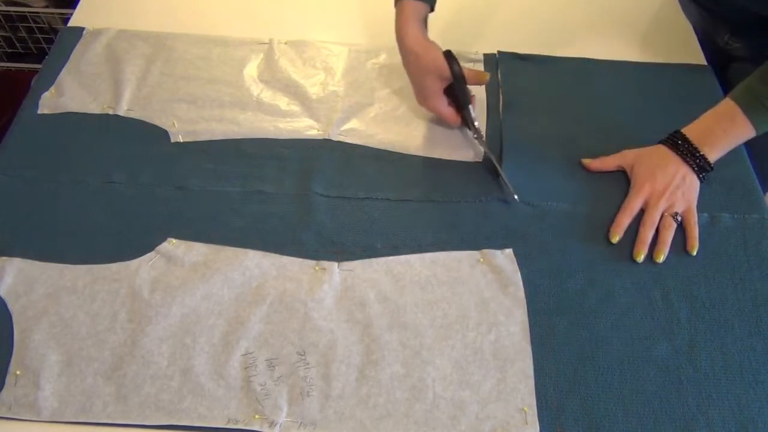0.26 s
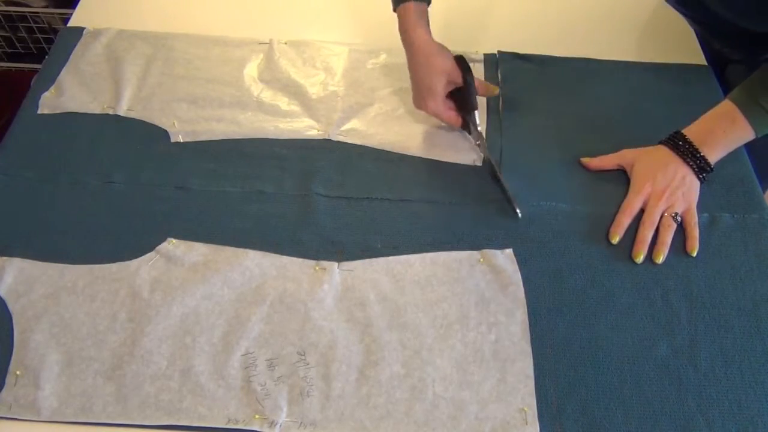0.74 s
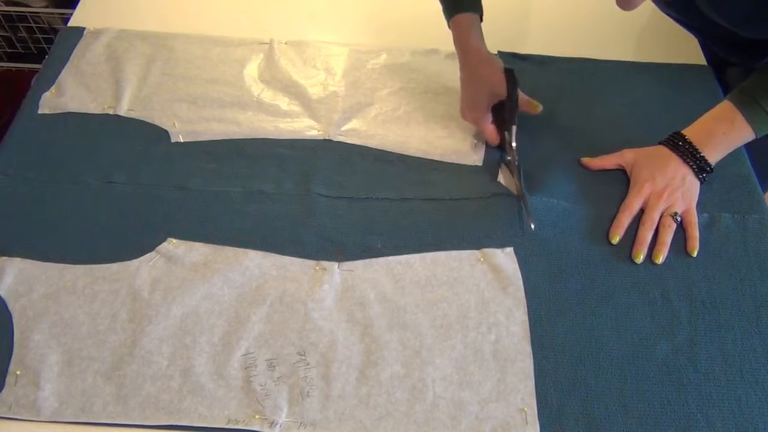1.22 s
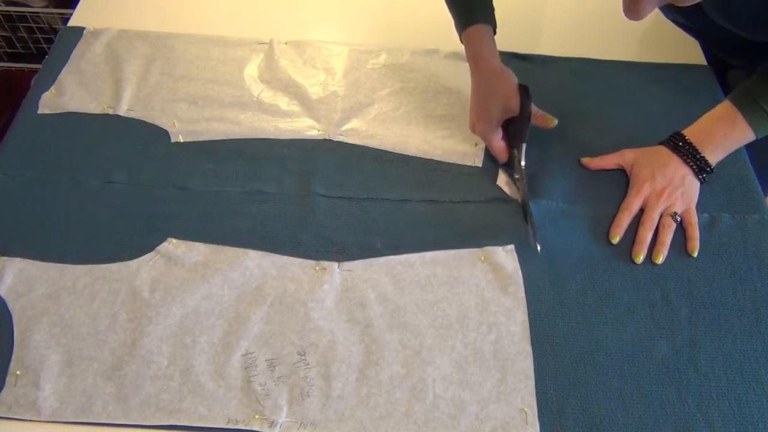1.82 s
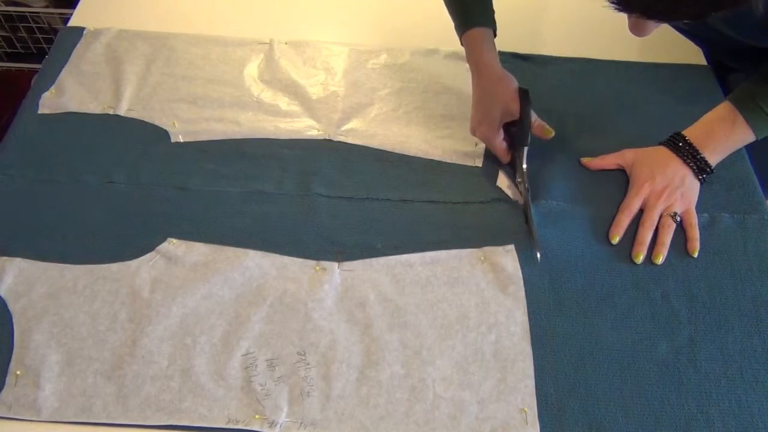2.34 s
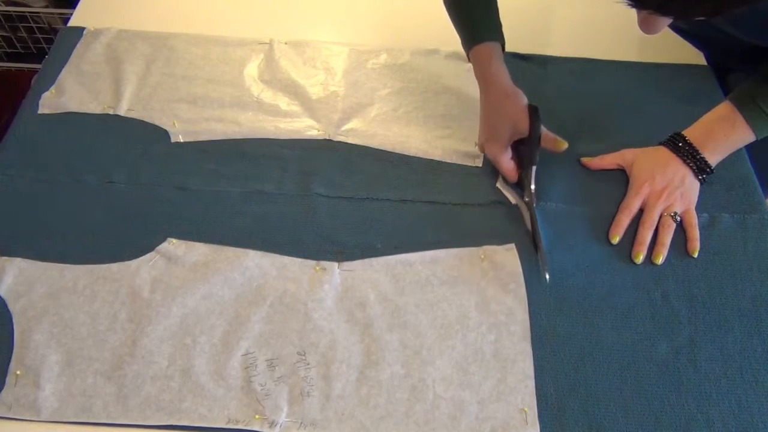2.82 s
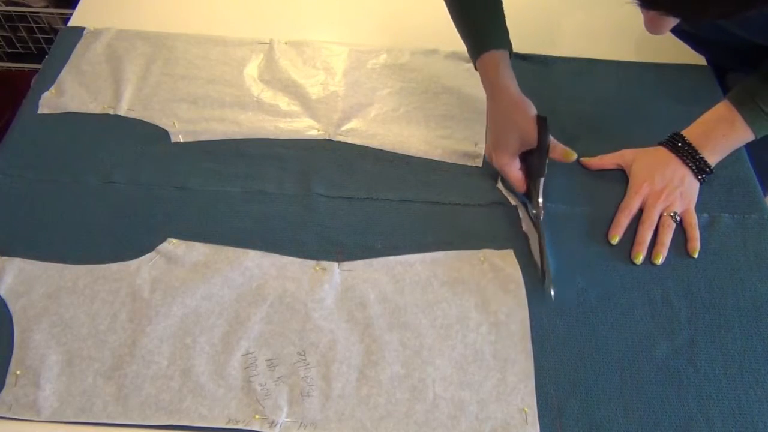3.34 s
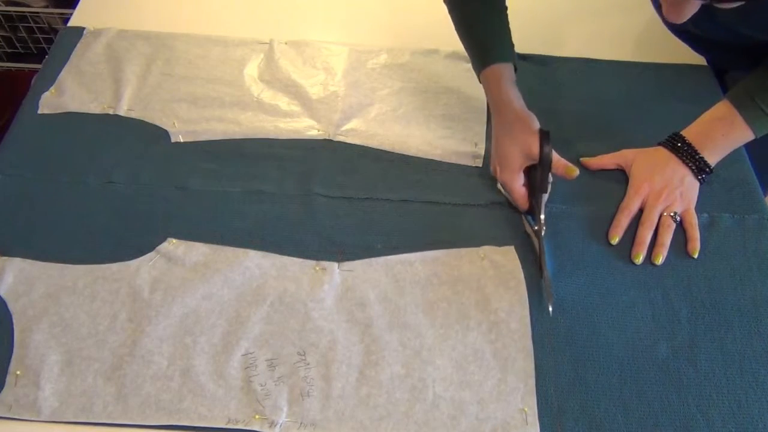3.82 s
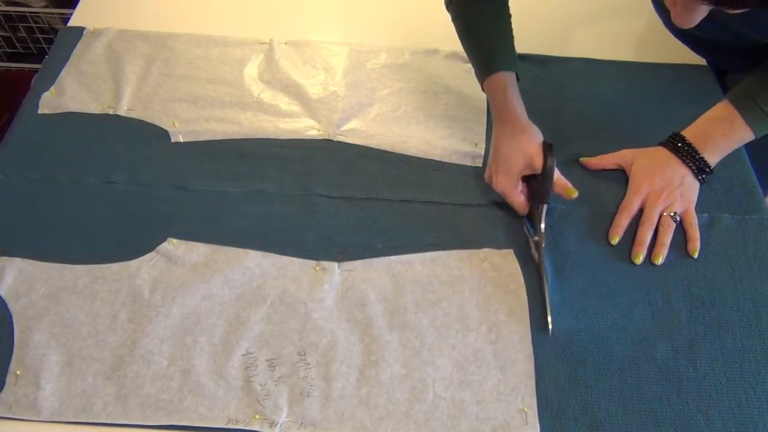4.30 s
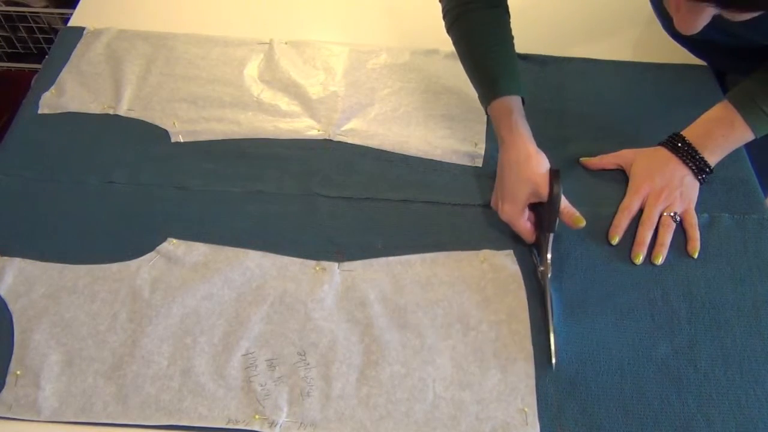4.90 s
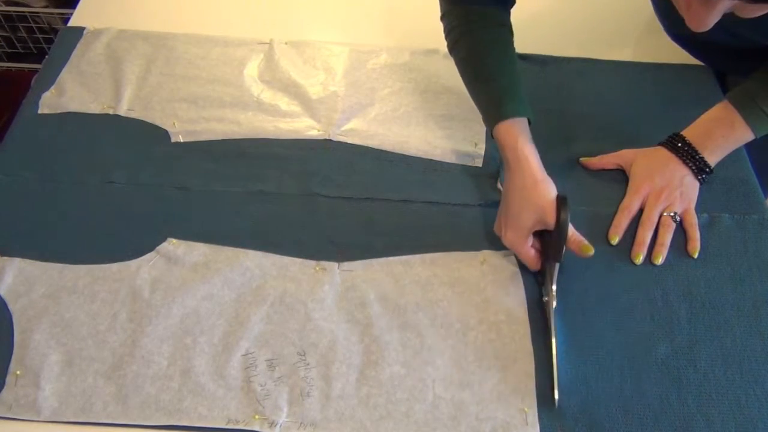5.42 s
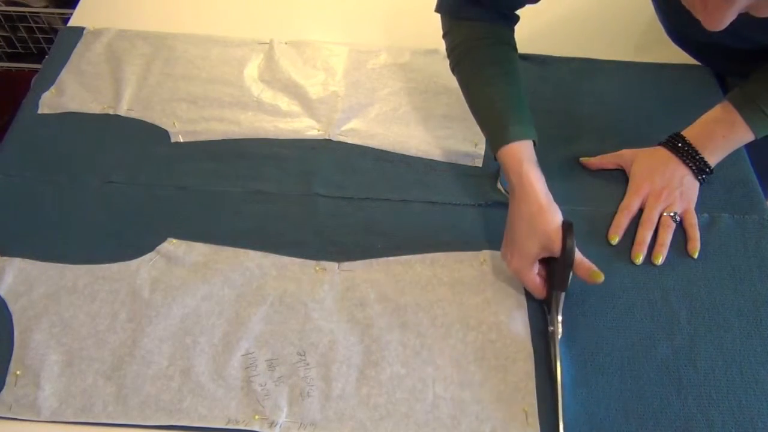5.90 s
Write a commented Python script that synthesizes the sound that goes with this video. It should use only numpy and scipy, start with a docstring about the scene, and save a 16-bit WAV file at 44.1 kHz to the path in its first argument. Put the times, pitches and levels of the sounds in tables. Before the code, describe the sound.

Large shears crunch through cloth on a wooden table in repeated close strokes, with fabric sliding and paper ticking between cuts.

```python
"""Large shears cut cloth that lies on a wooden table in a quiet room. Threads part in a dense crunch,
the blades stick and slip, and steel, handles and table top ring with it. The tips snip shut once;
between strokes cloth slides, the lower blade rubs the table, and paper and pivot tick. A small two-port
microphone hears the table's bass in opposite phase and overloads on the hardest slips."""
import sys
import numpy as np
from scipy import signal
from scipy.fft import rfft, irfft, next_fast_len
from scipy.io import wavfile
from scipy.ndimage import map_coordinates

SR = 44100
rng = np.random.default_rng(int(sys.argv[2]) if len(sys.argv) > 2 else 0)


def to_wav(sig):
    """Store sig (one row per channel, or 1-D mono) as 16-bit WAV at the path in sys.argv[1].

    Samples outside -1..1 are clipped; the rate is SR.
    """
    pcm = np.clip(np.atleast_2d(sig), -1, 1) * 32767
    pcm = np.round(pcm).astype(np.int16)
    wavfile.write(sys.argv[1], SR, pcm.T)  # frames by channels


N = 271426

# cloth sliding on the blades: (time [s], level [dB], fizz above that level [dB])
CLOTH_SLIDE = [(0, -37, -10.5), (.12, -40, -9), (.3, -43, -8), (.55, -56, -10), (1.05, -39.5, -4),
               (1.24, -52, -21), (1.8, -42, -7.5), (2.05, -54, -8), (2.8, -40.5, -11), (2.96, -56, 4),
               (3.5, -43, -3), (3.75, -54, -20), (4.0, -40, 1), (4.1, -59, -25), (4.63, -35, 0.5),
               (4.76, -43.5, -5), (5.2, -39.5, -2), (5.7, -36, -9.5), (6.15, -41.5, -1)]
# resonances of the steel blades: (frequency [Hz], width [Hz], level [dB])
BLADE_MODES = [(1588, 17, -0.5), (1830, 45, 5), (1973, 91, 4.5), (2082, 113, 5.5), (2250, 107, 7),
               (2441, 75, 3), (2627, 74, -1.5), (2890, 110, -9), (3380, 2800, -8.5)]


def amp(db):
    return 10 ** (np.asarray(db) / 20)


def unit_rms(x):
    return x / np.sqrt(np.mean(x ** 2) + 1e-20)


def along(points, hz):
    """Read a curve of (frequency, value) points on a log frequency axis."""
    f, v = np.transpose(points)
    return np.interp(np.log(hz + 1), np.log(f + 1), v)


def wobble(rate):
    """A smooth random curve with `rate` knots a second."""
    return map_coordinates(rng.standard_normal(int(N * rate / SR) + 4), [np.arange(N) * rate / SR])


def filtered(x, response):
    """Shape x with a complex frequency response."""
    size = next_fast_len(N + SR // 2)
    return irfft(rfft(x, size) * response(np.fft.rfftfreq(size, 1 / SR)), size)[..., :N]


def ring(force, modes, low_hz, high_hz):
    """Drive resonances that radiate between two band edges; white noise keeps its level."""
    def response(f):
        h = sum(amp(db) * 1j * f * width / (hz * hz - f * f + 1j * f * width) for hz, width, db in modes)
        h = h * (1j * f / (low_hz + 1j * f)) ** 3 / (1 + 1.2j * f / high_hz - (f / high_hz) ** 2) ** 2
        return h / np.sqrt(np.mean(abs(h) ** 2))
    return filtered(force, response)


def room_tone():
    """Soft hiss and rumble, and two thin electrical tones."""
    # colour of the noise: (frequency [Hz], relative density [dB])
    colour = [(15, -37), (25, -2), (54, 0.5), (75, -3), (128, -6), (231, -8.5), (450, -13), (709, -9),
              (952, -16), (1120, -14), (2180, -8), (6200, -24.5), (15000, -31)]
    # its stereo width: (frequency [Hz], side above mid [dB])
    width = [(60, 9), (200, -1), (700, -4), (2400, -13), (4400, -1), (8000, 3), (15000, -6.5)]
    # steady electrical whine: (frequency [Hz], rms level [dB])
    tones = [(11719, -70), (15625, -58)]
    mid, side = filtered(rng.standard_normal((2, N)),
                         lambda f: unit_rms(amp(along(colour, f))) * [f ** 0, amp(along(width, f))])
    whine = sum(amp(db) * np.sqrt(2) * np.sin(2 * np.pi * hz * np.arange(N) / SR) for hz, db in tones)
    return amp(-46.5 + 1.6 * wobble(1.5)) * np.array([mid + side, mid - side]) + whine


def friction_levels():
    """Sliding, strokes and rubs add their power: blade dB, then handles, table and fizz relative to it."""
    # closing strokes: (bite [s], rise [s], length [s], blades [dB], handles [dB], table [dB], fizz [dB],
    # growth of handles and table as the cut runs out to the tips [dB/s])
    strokes = [(0.636, 0.029, .27, -16, -0.5, -7, -21.5, 27),
               (1.312, 0.076, 0.21, -15, -3.5, -7.5, -18, 39),
               (2.182, 0.086, 0.051, -17, -3.5, -8.5, -16, 44),
               (2.408, 0.013, 0.18, -16.5, 0.5, -4, -16.5, 16),
               (3.075, 0.01, 0.13, -18.5, 3, 1.5, -10.5, 5), (4.202, 0.09, 0.23, -19, -3, -2.5, -16.5, 17),
               (4.842, 0.07, 0.14, -16, -1.5, -6, -14.5, 19), (5.307, 0.033, .16, -18, -0.5, -5, -18.5, 15),
               (5.767, 0.042, 0.12, -18.5, 1.5, -1.5, -18.5, 4.6)]
    # the lower blade rubs the table as the shears open or move up:
    # (peak time [s], blades [dB], handles [dB], table [dB])
    rubs = [(0.06, -43, 3, 11.5), (0.587, -36.5, -0.5, 0), (1.648, -27.5, 5, 1), (2.68, -27, 5, 1.5),
            (2.993, -37.5, 0, 4), (3.04, -24.5, -4, -11), (3.317, -24.5, 2.5, 2.5), (3.639, -45.5, 0.5, 9),
            (4.512, -28, 1.5, 5.5), (4.778, -37, -14, 2.5), (5.095, -25, 1.5, -1), (5.568, -26.5, 2, 2.5),
            (6.029, -29.5, 2.5, 2)]
    bite_db, sag_db_per_s, release_db_per_s = 35, 16.5, 200
    rub_rise_db_per_s, rub_fall_db_per_s, rub_hold_s, rub_fizz_db = 453, 213, 0.0085, -17
    t = np.arange(N) / SR
    times, slide_db, hiss_db = np.transpose(CLOTH_SLIDE)
    colour_db = [0 * t, np.full(N, -5), np.full(N, -14), np.interp(t, times, hiss_db)]
    power = amp(np.interp(t, times, slide_db) + colour_db) ** 2
    for at, rise, length, db, handle_db, table_db, fizz_db, growth in strokes:
        run_s = np.clip(t - at, 0, length)
        attack_db = bite_db * (at - t).clip(0) / rise
        decay_db = sag_db_per_s * run_s + release_db_per_s * (t - at - length).clip(0)
        body_db = growth * (run_s - length / 2)
        colour_db = [0 * t, handle_db + body_db, table_db + body_db, np.full(N, fizz_db)]
        power += amp(db - attack_db - decay_db + colour_db) ** 2
    for at, db, handle_db, table_db in rubs:
        fade_db = np.maximum(rub_rise_db_per_s * (at - t), rub_fall_db_per_s * (t - at - rub_hold_s))
        power += amp(db - fade_db.clip(0) + [[0], [handle_db], [table_db], [rub_fizz_db]]) ** 2
    cut_db, *parts_db = 10 * np.log10(power)
    return cut_db, *(parts_db - cut_db)


def grit(snaps_per_s, spread_db, snap_share):
    """Random snaps of uneven size on a bed of rubbing noise; rms 1."""
    size_db = spread_db * np.clip(rng.standard_normal(N), -2, 2)
    snaps = (rng.random(N) < snaps_per_s / SR) * amp(size_db) * rng.choice([-1, 1], N)
    return np.sqrt(snap_share) * unit_rms(snaps) + np.sqrt(1 - snap_share) * rng.standard_normal(N)


def fizz(force):
    """The broad treble of snapping fibres."""
    # colour of a snap: (frequency [Hz], relative density [dB])
    colour = [(2500, -9), (3500, 4.5), (4500, 2), (5500, 5.5), (7500, 6.5), (9000, -1), (10500, -11.5),
              (14000, -28), (17000, -49)]
    return filtered(force, lambda f: unit_rms(amp(along(colour, f))))


def table_top(force):
    """The wood rings under the shears; as they travel across it, other modes answer."""
    # resonances of the top: (frequency [Hz], width [Hz], level [dB])
    wood_modes = [(294.6, 11.6, 3), (324, 107, 8), (398, 14.3, 8.5), (471.4, 37.6, 7.5), (521.4, 15, 3.5),
                  (572, 33, 1.5), (683, 320, -3.5), (787, 16, -4)]
    # the changing balance: (time [s], middle band above the rest [dB])
    travel = [(0.7, 0), (1.5, 6), (2.5, 4), (3.1, 1.5), (4.3, -3.5), (5.9, -2.5)]
    middle_hz, width_hz = 395, 50
    tilt = amp(np.interp(np.arange(N) / SR, *np.transpose(travel)) / 2)
    middle = lambda f: np.exp(-((f - middle_hz) / width_hz) ** 2)
    push = filtered(force * tilt, middle) + filtered(force / tilt, lambda f: 1 - middle(f))
    return ring(push, wood_modes, low_hz=229, high_hz=974)


def table_boom():
    """The top flexes under the lower blade; most of this bass reaches the ports in opposite phase."""
    # bending modes of the whole top: (frequency [Hz], width [Hz], level [dB])
    flex_modes = [(45, 40, -13), (90, 35, -12), (155, 22, 0), (178, 22, -3), (220, 40, -14), (385, 18, -9)]
    cut_db, _, table_db, _ = friction_levels()
    weight = amp(1.05 * cut_db + 0.7 * table_db + 3)
    shake, air = ring(weight * rng.standard_normal((2, N)), flex_modes, low_hz=15, high_hz=430)
    return shake * [[1], [-1]] + amp(-17.5) * air


def snip():
    """The tips shut and scrape past each other: sudden, steely, dying away."""
    # resonances of the tips: (frequency [Hz], width [Hz], level [dB])
    tip_modes = [(2440, 280, 8.5), (2820, 300, 1), (3560, 900, -4), (5300, 2300, -3.5), (7260, 1900, -28)]
    at_s, level_db, attack_s, t60_s = 0.1375, -16.5, 0.00079, 0.24
    t = np.clip(np.arange(N) / SR - at_s, 0, 1)
    envelope = amp(level_db - 60 * t / t60_s) * (1 - np.exp(-t / attack_s))
    scrape = envelope * grit(snaps_per_s=460, spread_db=16, snap_share=0.19)
    return ring(scrape, tip_modes, low_hz=1500, high_hz=9900)


def scrapes(times, levels_db, t60_s, kick, rise_share):
    """A scrape that swells, kicks and dies at each time; one row of force for each row of levels."""
    t, t60 = np.arange(SR // 10) / SR, t60_s[:, None]
    swell = amp(-60 * t / t60) * (1 - np.exp(-t / (rise_share * t60)))
    bursts = rng.standard_normal((len(times), len(t))) * swell / swell.max(1, keepdims=True)
    bursts[:, SR // 1000] = kick
    force = np.zeros((len(levels_db), N + SR))
    for at, gains, burst in zip(times, amp(levels_db).T, bursts):
        start = round(at * SR)
        force[:, start:start + len(t)] += np.outer(gains, burst)
    return force[:, :N]


def slips():
    """The blades slip through a bunch of threads: short slips jolt, longer ones drag."""
    # (time [s], blades [dB], then relative to the blades: handles [dB], table [dB], snap [dB]; t60 [s])
    hits = [(0.2812, -21.5, -30, -8, -19, 0.01), (0.6319, -24, -8, 1.5, -24, 0.053),
            (0.6415, -7, -1, -5.5, -14.5, 0.053), (0.6788, -3, -4.5, -28, -15, 0.016),
            (0.7065, -5, -16, -3, -20, 0.019), (0.7088, -4.5, -15, -26, -10.5, 0.011),
            (0.7434, 3, -34, -15, -15.5, 0.01), (0.818, 1, -4, -8, -12.5, 0.01),
            (0.8425, -14, 7, 5, -36, 0.028), (1.305, -14.5, -14, -7, -9, 0.028),
            (1.325, -11.5, 2, -21, -19, 0.037), (1.3404, -9, -30, -15, -9, 0.027),
            (1.3634, -3.5, -30, -10, -25, .028), (1.4005, -5.5, -34, -4, -18, 0.024),
            (1.4312, 0.5, -4.5, -32, -9, .011), (1.4699, -6.5, -25, -5.5, -23, 0.038),
            (1.5068, -10.5, -15, -6, -6, 0.019), (2.1453, -21.5, 1, -3, -23, 0.02),
            (2.175, -14, -19, -5, -27, 0.016), (2.2319, -12, -24, -6, -8.5, 0.053),
            (2.4113, -9.5, -3, 2.5, -9, 0.041), (2.461, -8, -13, -13, -15, 0.029),
            (2.4954, -2.5, -19, -2.5, -14.5, 0.02), (2.5433, -7.5, -10, 4, -8, 0.022),
            (2.9934, -27, 5.5, 10, -24, 0.033), (3.0476, -12.5, -9, -6, -17, 0.021),
            (3.0779, -9.5, -8, 4, -18, 0.031), (3.099, -18, -10, 4, -14, 0.034),
            (3.1421, -10, -19, 0, -9, 0.026), (3.1724, -12.5, -2, -4, -5, 0.036),
            (3.229, -15, -14, -5, 0.5, .02), (4.1777, -29, -13, 10.5, -11, 0.018),
            (4.2061, -9.5, -4, 0, -11, 0.049), (4.2325, -13.5, -7, -3.5, -3, 0.022),
            (4.2572, -6.5, -4, -2.5, -19, 0.04), (4.2838, 2, -17, -24, -13.5, 0.017),
            (4.3122, -5, -18, -11, -31, 0.031), (4.3297, -5.5, -0.5, 1.5, -13, 0.033),
            (4.3652, -9, -1, 0, -12, 0.024), (4.3747, -10.5, -2, -5, -11, 0.04),
            (4.4015, -9, -3, 4.5, -4.5, 0.023), (4.815, -14, -20, -25, -11, 0.016),
            (4.8414, -10, -18, -6, -8.5, 0.058), (4.8736, -9, -18, 2.5, -19, 0.04),
            (4.903, -4.5, -13, -4.5, -29, .026), (4.927, -6, -17, -0.5, -22, 0.03),
            (4.9757, -10, -15, -9, -8, 0.018), (5.294, -20, 0, -4, -1, 0.017),
            (5.3112, -16, 2, 2.5, 2, 0.036), (5.3364, -10, -5, 3.5, -6, 0.028),
            (5.356, -10.5, -18, 1.5, -17, 0.054), (5.3914, -2, -22, -6.5, -17, 0.034),
            (5.4213, -9, -14, -7, -15, 0.031), (5.7521, -20, 6, 5, -1, 0.017),
            (5.7817, -7.5, -5, -1, -6, .028), (5.8074, -9.5, -1, 0.5, -10.5, 0.035),
            (5.8424, -7, 4.5, -4, -11.5, .023)]
    at, db, handle_db, table_db, snap_db, t60 = np.transpose(hits)
    crest_db = 6  # the scrape sits this far under the listed level
    levels_db = db - crest_db + np.array([0 * db, handle_db, table_db, snap_db])
    return scrapes(at, levels_db, t60, kick=8.2 * (0.013 / t60) ** 1.38, rise_share=0.11)


def cutting():
    """Parting threads and slips drive blades, handles, table top and air alike."""
    # resonances of the handles: (frequency [Hz], width [Hz], level [dB])
    handle_modes = [(1087, 27, 6), (1176, 26, -3), (1241.7, 93, 2), (1348, 19, 3), (1457, 135, -0.5)]
    cut_db, handle_db, table_db, fizz_db = friction_levels()
    stick = np.clip(wobble(65), -2, 2)  # the blades bite in lumps
    crunch = unit_rms(amp(1.33 * stick) * grit(snaps_per_s=900, spread_db=2, snap_share=0.31))
    crackle = unit_rms(amp(6 * stick) * grit(snaps_per_s=700, spread_db=4, snap_share=0.45))
    bed_db = cut_db + [np.full(N, -2.5), handle_db - 2, table_db - 3.5, fizz_db - 0.3]
    on_blades, on_handles, on_table, on_air = amp(bed_db) * [crunch, crunch, crunch, crackle] + slips()
    blades = ring(on_blades, BLADE_MODES, low_hz=1160, high_hz=2950)
    handles = ring(on_handles, handle_modes, low_hz=640, high_hz=1745)
    return blades + handles + table_top(on_table) + fizz(on_air)


def ticks():
    """Bright snaps with a little blade ring; faint ones fall at random while cloth slides."""
    # ticks of paper and pivot: (time [s], level [dB])
    cues = [(1.039, -36), (1.1535, -34.5), (1.8545, -35.5), (2.8719, -33.5), (2.8878, -29), (2.9, -27.5),
            (2.9698, -30.5), (3.7793, -27.5), (3.897, -31.5), (3.941, -30.5), (4.016, -31), (4.0462, -29.5),
            (4.0576, -32), (4.598, -26), (4.6127, -24.5), (4.6242, -21.5), (4.6714, -27), (4.7142, -28),
            (5.0234, -36), (5.042, -27), (5.166, -32), (5.1753, -30), (5.1924, -28), (5.2067, -18.5),
            (5.2542, -31.5), (5.476, -24), (5.5884, -34), (5.674, -27.5), (5.9753, -39)]
    faint_per_s, ring_db = 5.5, -6
    when, softness = rng.random((round(faint_per_s * N / SR), 2)).T
    faint_s = when * N / SR
    slide_s, slide_db, _ = np.transpose(CLOTH_SLIDE)
    faint_db = np.interp(faint_s, slide_s, slide_db) - 1 - 10 * softness
    at, db = np.hstack([np.transpose(cues), [faint_s, faint_db]])
    snap, steel = scrapes(at, [db, db + ring_db], t60_s=np.full(len(at), 0.015), kick=4.5, rise_share=0.19)
    return fizz(snap) + ring(steel, BLADE_MODES, low_hz=2000, high_hz=5170)


def mic_ports(x):
    """One source at two ports: level and phase part by frequency, half on each side."""
    # (frequency [Hz], left phase lead [rad])
    lead = [(230, -2.6), (340, -.7), (550, -.1), (2000, .3), (3500, .6), (5500, 2.3), (11000, 2.1),
            (14000, .8)]
    # (frequency [Hz], left above right [dB])
    lean = [(300, 3), (1000, 3), (3000, 2.2), (5000, 2.5), (8000, 6), (13000, 1.5)]
    left = lambda f: amp(along(lean, f) / 2) * np.exp(0.5j * along(lead, f))
    return filtered(x, lambda f: np.array([left(f), 1 / left(f)]))


def room_reverb(x):
    """Each frequency of the room's answer dies at its own speed; each port hears its own tail."""
    # reverb send: (frequency [Hz], level [dB])
    send = [(150, -24), (400, -13), (1000, -12), (2500, -15), (4500, -11), (10000, -14)]
    # decay between the walls: (frequency [Hz], t60 [s])
    decay = [(100, 0.97), (1000, 0.26), (4000, 0.33), (12000, 0.048)]
    hz, t, noise = signal.stft(rng.standard_normal((2, SR // 2)), SR, nperseg=256)
    _, tail = signal.istft(noise * amp(-60 * t / along(decay, hz)[:, None]), SR, nperseg=256)
    feed = np.pad(filtered(x, lambda f: amp(along(send, f))), (200, 0))  # 4.5 ms pre-delay
    return signal.fftconvolve(feed[None], tail / np.linalg.norm(tail[0]), axes=1)[:, :N]


def scene():
    """The shears, close and in the room, over the table's bass and the room tone."""
    shears = cutting() + ticks() + snip()
    return mic_ports(shears) + room_reverb(shears) + table_boom() + room_tone()


def record(dry):
    """The input stage overloads at full scale; nothing passes above the band limit."""
    knee, top_hz = 12, 16390
    clipped = dry / (1 + abs(dry) ** knee) ** (1 / knee)
    return filtered(clipped, lambda hz: hz < top_hz)


dry = scene()
out = record(dry)
to_wav(out)
```